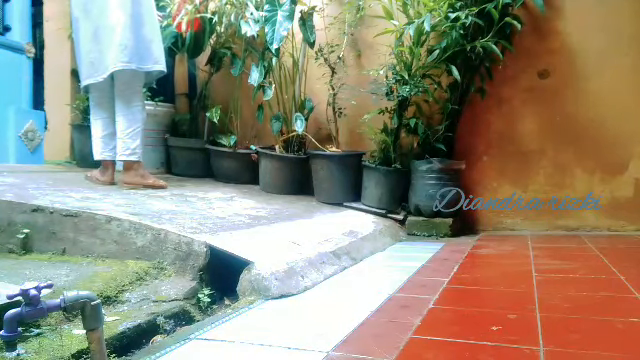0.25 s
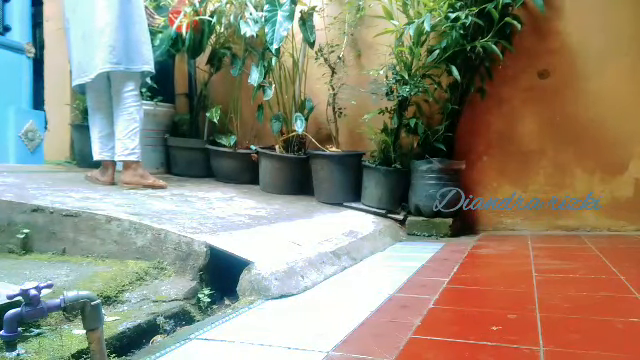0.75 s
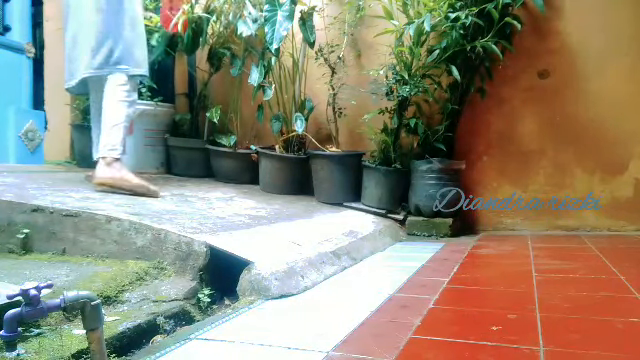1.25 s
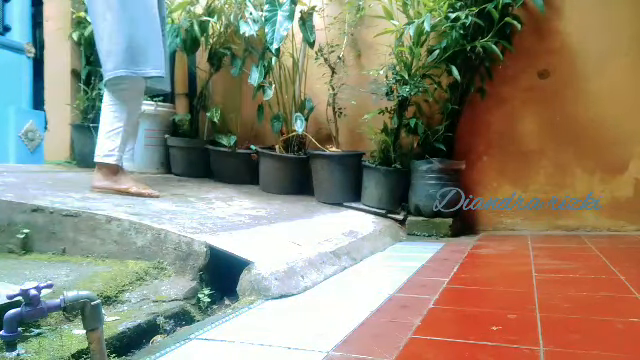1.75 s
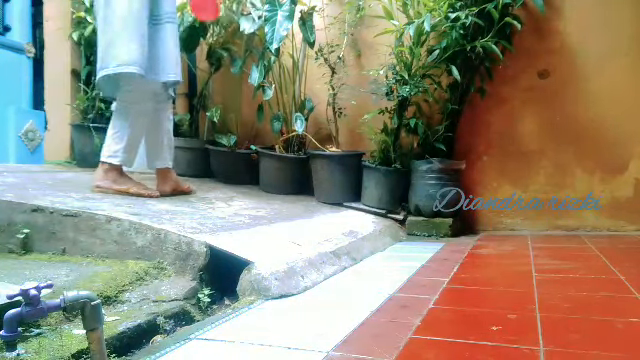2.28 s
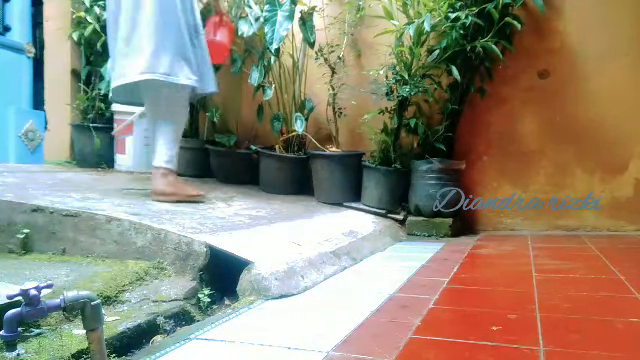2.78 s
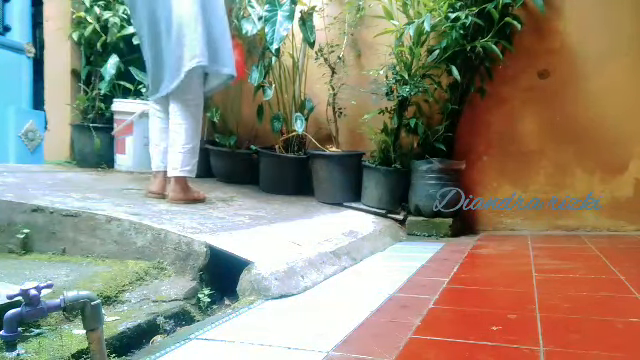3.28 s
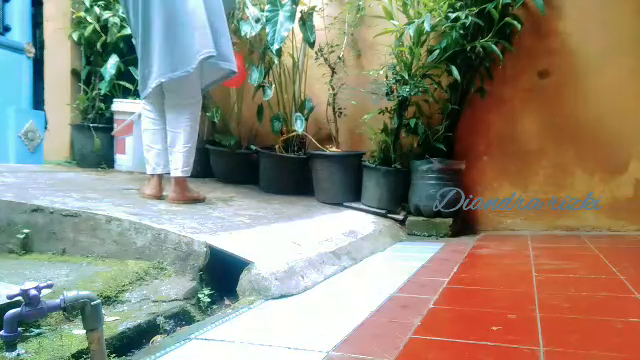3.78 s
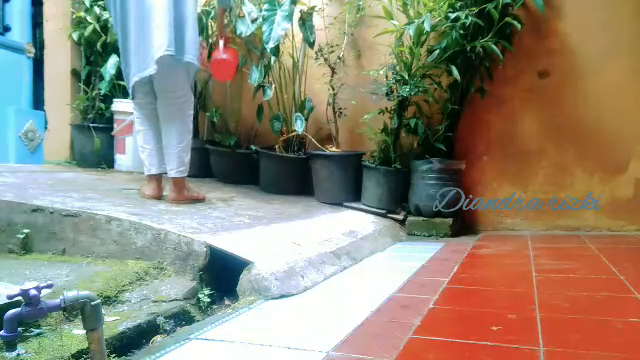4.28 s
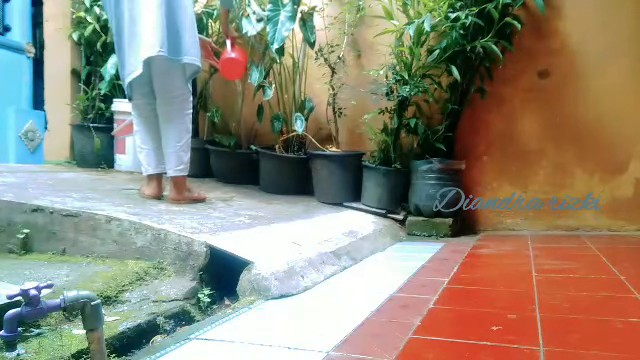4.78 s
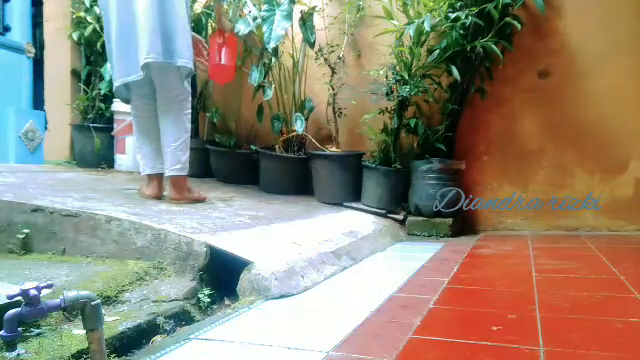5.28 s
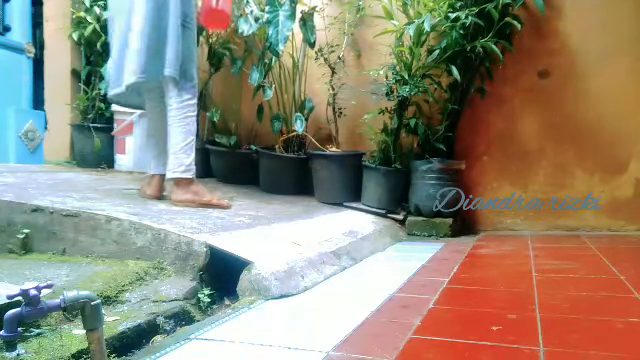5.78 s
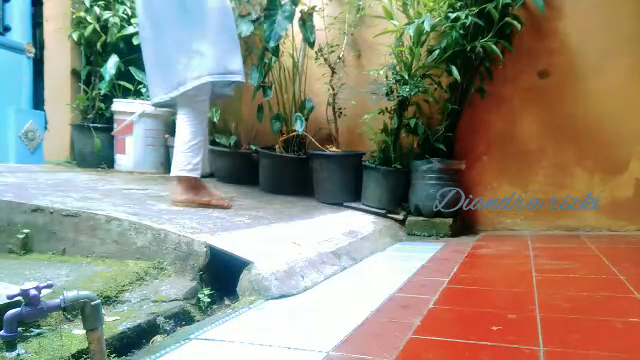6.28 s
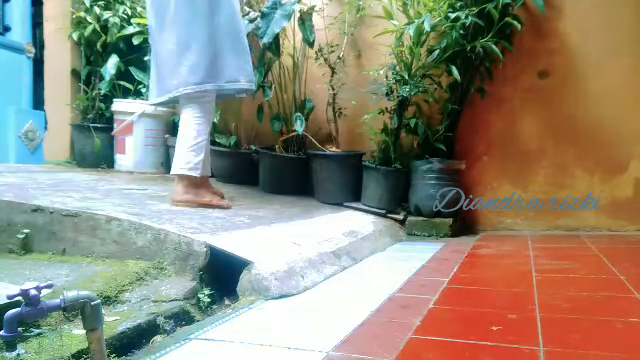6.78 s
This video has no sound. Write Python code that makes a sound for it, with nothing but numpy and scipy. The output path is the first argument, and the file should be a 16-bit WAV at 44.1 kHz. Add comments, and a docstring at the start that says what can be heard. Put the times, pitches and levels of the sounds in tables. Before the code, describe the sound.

Fine water patters on leaves and wet soil at close to medium distance, with small plops and hollow can glugs. Clear bird whistles sweep upward and trill, ringing between hard walls, with faint hoots behind. After the bird falls quiet, the pouring returns in stronger spurts. Finally the water stops, the hollow can thumps, and something scrapes grittily to a sharp clack, leaving gated, near-silent gaps.

```python
"""Potted plants are watered from a can in a small walled yard: spray hisses, droplets ring on leaves, soil
bubbles. Single drops tick, water plops and glugs, and splashes spatter and plop as bursts of band-limited
impacts. Birds hoot softly far off while a songbird whistles a loud phrase of gliding, trilled tones, echoed by
the walls. Late on come a hollow thump of ringing modes and a gritty scrape that ends in a clack. Noise makes
the steady air; a noise gate pulls down the pauses."""
import sys
import numpy as np
from scipy import signal
from scipy.fft import rfft, irfft
from scipy.io import wavfile
from scipy.ndimage import uniform_filter1d

SR = 44100
rng = np.random.default_rng(int(sys.argv[2]) if len(sys.argv) > 2 else 0)


def unload_wav(signal):
    """Save mono or channel-first audio to the path in sys.argv[1] as 16-bit WAV at rate SR, clipped to [-1, 1]."""
    wavfile.write(
        sys.argv[1],
        SR,
        np.round(np.clip(np.atleast_2d(signal).T, -1, 1) * 32767).astype(np.int16),
    )


N = 310552
TIME = np.arange(N) / SR
HALF_SECOND = TIME[:SR // 2]


def amp(db):
    """Decibels to gain."""
    return 10 ** (np.asarray(db) / 20)


def unit(x):
    """Scales to rms 1."""
    return x / np.sqrt(np.mean(x ** 2) + 1e-20)


def read(points, hz):
    """Interpolates a table on a log-frequency axis."""
    point_hz, value = np.transpose(points)
    return np.interp(np.log(hz + 1), np.log(point_hz + 1), value)


def add(mix, start_s, sound):
    """Mixes a sound in at its start time."""
    part = mix[max(round(start_s * SR), 0):][:len(sound)]
    part += sound[:len(part)]


def colour(x, points):
    """Filters x by a table of Hz and dB, then scales to rms 1."""
    gain = amp(read(points, np.fft.rfftfreq(len(x), 1 / SR)))
    return unit(irfft(rfft(x) * gain, len(x)))


def wander(length, size):
    """Smooth random drift: noise averaged twice over size samples, at rms 1 before the cut to length."""
    noise = rng.standard_normal(max(length, SR))
    return unit(uniform_filter1d(uniform_filter1d(noise, size), size))[:length]


def impacts(per_s, spread_db, size):
    """A random train of tiny impacts of either sign, a few much larger than the rest, at rms 1."""
    heights = amp(spread_db * np.minimum(rng.exponential(1, size), 4))
    signs = rng.choice([-1, 1], size)
    hits = rng.random(size) < per_s / SR
    return unit(heights * signs * hits)


def pings(hz, cycles, per_s, spread_db):
    """Droplets or bubbles of one pitch: random impacts each ring and decay over some cycles."""
    turns = np.arange(int(7 * cycles / hz * SR)) * hz / SR
    soft_start = 1 - np.exp(-(turns / 1.5) ** 2)
    ping = np.sin(2 * np.pi * turns) * np.exp(-turns / cycles) * soft_start
    return unit(signal.oaconvolve(impacts(per_s, spread_db, N), ping)[:N])


def ring(modes, rise_s):
    """A struck object: each mode (Hz, dB, t60 in s) decays on its own; a soft contact rounds the start."""
    t = HALF_SECOND
    tones = sum(amp(db - 60 * t / t60_s) * np.sin(2 * np.pi * hz * t) for hz, db, t60_s in modes)
    return tones * (1 - np.exp(-(t / rise_s) ** 2))


def cloud(db, length_s, centre_hz, octaves):
    """A short cloud of impacts in one log-frequency bell, with the treble dulled."""
    t, hz = HALF_SECOND, np.geomspace(40, 16000, 60)
    dull_db = read([(3900, 1.5), (4600, -14.0), (6500, -7.0), (14000, -34.5)], hz)
    band_db = -4.3 * (np.log2(hz / centre_hz) / octaves) ** 2 + dull_db
    grains = colour(impacts(per_s=3000, spread_db=3.0, size=len(t)), np.c_[hz, band_db])
    rise = np.minimum(t / (0.14 * length_s), 1)
    fall = np.exp(-np.maximum(t - length_s, 0) / 0.0033)
    return amp(db) * grains * rise * fall


# Echo decay between the walls. Each row: frequency in Hz, t60 in s before each source's decay factor.
YARD_DECAY = [(150, 0.43), (600, 0.36), (2000, 0.38), (3500, 0.39), (6000, 0.07), (14000, 0.57)]


def yard(x, wet, decay=1):
    """Direct sound plus dense wall echoes that decay per band; wet is their share of the power."""
    taps = rng.standard_normal(SR) * (rng.random(SR) < 3000 / SR)
    taps *= TIME[:SR] > .004  # first echo after 4 ms
    hz, t, bands = signal.stft(taps, SR, nperseg=256)
    t60_s = decay * read(YARD_DECAY, hz)[:, None]
    tail = signal.istft(bands * amp(-60 * t / t60_s) / np.sqrt(t60_s), SR, nperseg=256)[1]
    echoes = signal.fftconvolve(x, tail / np.linalg.norm(tail))[:N]
    return np.sqrt(1 - wet) * x + np.sqrt(wet) * echoes


# Spectrum of the yard's air. Each row: frequency in Hz, relative level in dB per Hz.
AIR_COLOUR = [(25, 1.5), (90, 7), (160, -2), (400, -8.5), (1000, -10.5), (3000, -11.5), (5000, -24),
              (8000, -24.5), (12500, -23), (15500, -15.5)]


def air():
    """Steady coloured noise."""
    return amp(-46) * colour(rng.standard_normal(N), AIR_COLOUR)


# Spectrum of the fine spray. Each row: frequency in Hz, relative level in dB per Hz.
SPRAY_COLOUR = [(1500, -33.5), (3500, 10), (5500, 5.5), (8000, -1), (10000, -0.5), (12500, 2),
                (15500, -10.5)]


def spray_hiss():
    """Fine spray: dense impacts blur into a bright hiss."""
    return colour(impacts(per_s=13000, spread_db=5.0, size=N), SPRAY_COLOUR)


# Balance of droplet pitches on the leaves. Each row: frequency in Hz, relative level in dB.
PATTER_COLOUR = [(900, -10.5), (1500, -4), (2100, 0), (2800, 1), (3750, 1), (4200, -8.5), (4800, -17.5),
                 (6000, -37.5)]


def leaf_patter(lowest_hz):
    """Droplets ring on leaves at many pitches; those below lowest_hz are held back."""
    patter = np.zeros(N)
    for hz in np.linspace(1000, 5600, 36):
        share = amp(read(PATTER_COLOUR, hz)) / np.sqrt(1 + (lowest_hz / hz) ** 16)
        patter += share * pings(hz * rng.uniform(1.0, 1.02), cycles=9, per_s=42, spread_db=2.5)
    return unit(patter)


# Balance of bubble pitches in the wet soil. Each row: frequency in Hz, relative level in dB.
BUBBLE_COLOUR = [(250, -16), (450, -8), (800, 6.5), (1100, -1.5), (1600, -1.5)]


def soil_bubbles():
    """Larger bubbles burst in wet soil, each a low decaying ring."""
    bubbles = np.zeros(N)
    for hz in np.geomspace(280, 1600, 18):
        bubbles += amp(read(BUBBLE_COLOUR, hz)) * pings(hz, cycles=12, per_s=4, spread_db=7)
    return unit(bubbles)


def flow(start_s, length_s, rise_s, fall_db_per_s):
    """Gain of running water: sets in quickly, holds, trails off."""
    t = TIME - start_s
    return np.clip(t / rise_s, 0, 1) * amp(-fall_db_per_s * np.maximum(t - length_s, 0))


POUR_RISE_S, SPRAY_FALL_DB_PER_S, PATTER_FALL_DB_PER_S = 0.01, 57, 105
GUSH_RISE_S, GUSH_FALL_DB_PER_S = .035, 122
GUSH_SPRAY_DB = -11.5  # relative to the gush's patter
THIN_HZ, GUSH_HZ = 2450, 1600  # lowest droplet pitch in a thin stream and in a gush
UNSTEADY_DB = 2.15  # rms wobble of the stream
# Tips of the can and dribbles. Each row: start in s, length in s, relative spray in dB, relative patter in dB.
CAN_POURS = [(-.05, 1.436, -41, -42.5), (2.263, 0.13, -50.5, -41.5), (3.31, 0.11, -44, -48.5),
             (3.673, 0.27, -50, -60), (3.836, 0.53, -45.5, -46.5), (4.508, 0.21, -47.5, -44.5),
             (4.807, 0.47, -44.5, -43), (5.412, 0.095, -61.5, -64.5)]
# Gushes, when the stream swells and hits harder. Each row: start in s, length in s, relative patter in dB.
STREAM_GUSHES = [(0.074, 0.073, -44), (0.694, 0.28, -47), (1.367, 0.036, -38.5), (1.546, .09, -50.5),
                 (3.424, 0.1, -41.5), (3.879, 0.34, -41), (4.35, 0.091, -43), (4.782, .16, -40),
                 (5.046, 0.19, -37)]


def shower():
    """Pours and gushes drive hiss, leaf patter and soil bubbles; gushes deepen the patter."""
    spray, stream, gushing = np.zeros((3, N))
    for start_s, length_s, spray_db, patter_db in CAN_POURS:
        spray += amp(spray_db) * flow(start_s, length_s, POUR_RISE_S, SPRAY_FALL_DB_PER_S)
        stream += amp(patter_db) * flow(start_s, length_s, POUR_RISE_S, PATTER_FALL_DB_PER_S)
    for start_s, length_s, patter_db in STREAM_GUSHES:
        gush = flow(start_s, length_s, GUSH_RISE_S, GUSH_FALL_DB_PER_S)
        spray += amp(patter_db + GUSH_SPRAY_DB) * gush
        stream += amp(patter_db) * gush
        gushing += gush
    lowest_hz = THIN_HZ + (GUSH_HZ - THIN_HZ) * np.sqrt(np.minimum(gushing, 1))
    hiss = amp(2.5) * spray * spray_hiss()
    hits = stream * (amp(10.5) * leaf_patter(lowest_hz) + amp(-13) * soil_bubbles())
    wobble = amp(UNSTEADY_DB * wander(N, size=1500))
    return yard((hiss + hits) * wobble, wet=0.37, decay=0.68)


# Large drops on leaves. Each row: start in s, relative level in dB, ring in Hz, t60 in s.
LEAF_DROPS = [(.0463, -1.5, 3740, 0.015), (0.112, -3, 2800, 0.017), (.4968, -23, 3850, 0.016),
              (1.3463, -18, 3340, .018), (1.4386, -19, 2250, 0.021), (3.4845, 3, 3720, 0.017),
              (3.6922, -4, 4400, 0.011), (4.074, -6.5, 2850, 0.022), (4.407, -7.5, 2890, 0.043),
              (4.5231, -6.5, 3810, 0.019), (4.5932, -5, 3010, 0.027), (4.635, 0.5, 2923, 0.031),
              (4.954, -0.5, 2750, .018), (5.0524, 1, 3590, .018), (5.551, -35.5, 3100, .09)]


def drips():
    """Single drops tick on leaves: two short modes, the upper one weaker and briefer."""
    ticks = np.zeros(N)
    for start_s, db, hz, t60_s in LEAF_DROPS:
        modes = [(hz, db - 5.5, t60_s), (hz * 1.4, db - 14.5, t60_s / 2)]
        add(ticks, start_s, ring(modes, rise_s=0.0012))
    return yard(ticks, wet=0.34, decay=0.77)


# Plops and glugs of water. Each row: start in s, mean pitch in Hz, relative level in dB, t60 in s.
WATER_PLOPS = [(.07, 283.4, -30, 0.4), (.13, 1091, -36.5, 0.7), (.25, 324, -37, 0.39), (.55, 94.8, -35, 0.45),
               (1.14, 447, -37, 0.13), (1.19, 451, -31.5, 0.082), (1.53, 440, -34.5, 0.32),
               (2.65, 387, -31.5, 0.29), (2.848, 341, -32.5, 0.45), (3.069, 246, -26.5, 0.12),
               (3.49, 481.5, -26, 0.14), (3.59, 319, -27, 0.053), (3.85, 867, -31, 0.09),
               (4.08, 890, -36, 0.11), (4.17, 600, -40.5, 0.11), (4.321, 1600, -33.5, 0.3),
               (4.37, 110.3, -35, 0.26), (4.41, 1052, -32.5, 0.12), (4.645, 282, -37, 0.5),
               (4.781, 278, -32, 0.48), (5.571, 119.7, -38, 0.38)]


def water_plops():
    """Water plops and glugs: decaying tones with a soft start and an unsteady pitch."""
    glugs, t = np.zeros(N), HALF_SECOND
    for start_s, hz, db, t60_s in WATER_PLOPS:
        turns = np.cumsum(hz * (1 + .09 * wander(len(t), size=200))) / SR
        envelope = (1 - np.exp(-t / 0.0037)) * amp(db + 4.5 - 60 * t / t60_s)
        add(glugs, start_s, np.sin(2 * np.pi * turns) * envelope)
    return yard(glugs, wet=0.24)


SPATTER_OCTAVES, PLOP_OCTAVES = 0.53, 0.57
# Splashes on soil. Each row: start in s, length in s, relative spatter in dB, spatter centre in Hz,
# relative plop in dB, plop centre in Hz.
SOIL_SPLASHES = [(0.101, 0.032, -27, 2870, -33, 1030), (0.198, 0.13, -28, 2560, -34, 1200),
                 (0.71, 0.051, -32, 2220, -34, 606), (0.814, 0.078, -24, 2600, -53, 1320),
                 (1.391, 0.0072, -54, 1700, -28.5, 850), (1.429, 0.0078, -17, 3340, -27, 600),
                 (2.298, 0.075, -36.5, 2150, -42.5, 993), (2.774, 0.043, -33.5, 1670, -36.5, 980),
                 (3.061, 0.022, -26, 2376, -26.5, 253), (3.401, 0.077, -31, 2550, -30, 483),
                 (3.473, 0.041, -20.5, 2260, -21.5, 514), (3.538, 0.07, -33, 2100, -35.5, 315),
                 (3.801, 0.068, -28, 2900, -33.5, 1330), (4.389, 0.016, -38, 3000, -41, 1200),
                 (4.815, 0.08, -25.5, 2400, -27.5, 497), (5.042, 0.019, -20, 2970, -30.5, 860),
                 (5.066, 0.071, -41, 2500, -24, 910)]


def splashes():
    """Water slaps the soil: a bright spatter and a plop, both clouds of impacts."""
    out = np.zeros(N)
    for start_s, length_s, spatter_db, spatter_hz, plop_db, plop_hz in SOIL_SPLASHES:
        spatter = cloud(spatter_db, length_s, spatter_hz, SPATTER_OCTAVES)
        plop = cloud(plop_db, length_s, plop_hz, PLOP_OCTAVES)
        add(out, start_s, spatter + plop)
    return yard(out, wet=0.47, decay=0.71)


ONSET_DB, FADE_SHAPE, OVERTONE_DB = -15.5, 0.93, -48
TRILL_UNEVEN, TREMOLO_PER_HZ = 0.096, 0.0013  # a deeper trill also shakes the loudness


def whistle(length_s, first_hz, goal_hz, half_s, depth_hz, db, rise_s, fade_db, waver, trill_hz):
    """A near-pure tone glides towards its goal; a fast, uneven trill is deepest in mid-glide."""
    t = np.arange(0, length_s, 1 / SR)
    glide = t ** 2 / (t ** 2 + half_s ** 2)
    hz = first_hz + (goal_hz - first_hz) * glide
    depth = depth_hz * (1 - (2 * glide - 1) ** 2)
    onset_db = ONSET_DB * np.maximum(1 - t / rise_s, 0) ** 2
    faded = (np.maximum(t - rise_s, 0) / (length_s - rise_s)) ** FADE_SHAPE
    level_db = db + onset_db - fade_db * faded
    trill_rate = trill_hz * (1 + TRILL_UNEVEN * wander(len(t), size=300))
    trill = depth * np.sin(2 * np.pi * np.cumsum(trill_rate) / SR)
    phase = 2 * np.pi * np.cumsum(hz * (1 + waver * wander(len(t), size=70)) + trill) / SR
    tone = np.sin(phase) + amp(OVERTONE_DB) * np.sin(2 * phase)
    tone *= 1 + TREMOLO_PER_HZ * trill
    return np.sqrt(2) * amp(level_db) * tone * signal.windows.tukey(len(t), .1)


HOOT_RISE_S, HOOT_FADE_DB, HOOT_FLUTTER_HZ = .05, 4, 32  # flutter is the trill depth
# Soft, far hoots. Each row: start in s, length in s, first pitch in Hz, goal pitch in Hz, level in dB.
FAR_HOOTS = [(0.336, 0.22, 585, 599, -39), (0.472, 0.2, 645.5, 600, -39), (1.928, .29, 1274, 1162, -38),
             (2.148, .21, 874, 977, -38), (2.326, .42, 650, 574, -42.5), (4.447, 0.096, 667, 570, -41),
             (4.991, .345, 607, 584, -37.5)]


def far_hoots():
    """Low fluttering whistles, heard almost wholly as echoes."""
    far = np.zeros(N)
    for start_s, length_s, first_hz, goal_hz, db in FAR_HOOTS:
        hoot = whistle(length_s, first_hz, goal_hz, length_s / 2, HOOT_FLUTTER_HZ, db,
                       HOOT_RISE_S, HOOT_FADE_DB, waver=0.035, trill_hz=38.24)
        add(far, start_s, hoot)
    return yard(far, wet=0.94)


# Whistled notes. Each row: start in s, length in s, first pitch in Hz, goal pitch in Hz, time to mid-glide in s,
# trill depth in Hz, level in dB, rise in s, fade in dB (negative grows).
SONG_NOTES = [(.53, 0.051, 2157, 2290, .05, 10, -32.5, 0.077, -0.5),
              (0.587, 0.27, 2234, 2745, 0.093, 37, -14.5, 0.074, 1.5),
              (0.991, 0.25, 2685, 3497, 0.098, 187, -12, 0.028, 5),
              (1.382, 0.06, 2119, 2180, 0.073, 10, -15.5, 0.014, 13.5),
              (1.446, 0.22, 2122, 2705, 0.093, 73, -18.5, 0.055, -1),
              (1.718, 0.11, 2584, 2963, 0.045, 96, -10.5, 0.072, 4.5),
              (1.782, 0.26, 3228, 3600, 0.028, 116, -13.5, .04, 25),
              (2.039, 0.098, 2123, 1983, 0.043, 90, -20.5, 0.01, 4.5),
              (2.187, .25, 2100, 2231, 0.067, 40, -22, 0.057, 11),
              (2.37, 0.18, 3260, 3483, 0.048, 130, -16.5, 0.074, 5),
              (2.478, 0.098, 3473, 3155, .075, 240, -14.5, 0.022, 7.5),
              (2.595, 0.16, 2425, 2190, 0.19, 110, -15.5, 0.021, 6),
              (2.829, 0.24, 3427, 3647, .05, 112, -13.5, 0.059, 14.5),
              (3.049, 0.17, 2352, 2325, 0.042, 18, -19, 0.008, 5),
              (3.221, .14, 2075, 2019, 0.06, 11, -23, 0.024, 5)]


def songbird():
    """A loud phrase of trilled whistles rings long between the walls."""
    near = np.zeros(N)
    for start_s, *note in SONG_NOTES:
        add(near, start_s, whistle(*note, waver=0.0098, trill_hz=75.38))
    return yard(near, wet=0.89, decay=1.77)


# Faint brief puffs of noise. Each row: start in s, relative level in dB, length in s, centre in Hz,
# width in octaves.
FAINT_PUFFS = [(2.128, -40.5, 0.069, 700, 0.85), (2.644, -43.5, 0.04, 890, 3.4),
               (3.022, -38.5, 0.034, 555, 0.073), (5.555, -41.5, 0.061, 217, 0.41),
               (5.778, -35.5, 0.092, 870, .15), (6.168, -44, 0.079, 800, 0.1),
               (6.257, -42, 0.062, 990, 1.3), (6.484, -25.5, 0.029, 242, 0.4),
               (6.719, -46, 0.024, 500, 1.36), (6.81, -45, 0.0071, 600, 0.67),
               (6.847, -56.5, 0.005, 1007, 1.6), (7, -44, 0.052, 777, 0.35)]


def faint_puffs():
    """Faint brief clouds of noise, some narrow and toneful, some wide and dull."""
    out = np.zeros(N)
    for start_s, db, length_s, centre_hz, octaves in FAINT_PUFFS:
        add(out, start_s, cloud(db, length_s, centre_hz, octaves))
    return yard(out, wet=0.47, decay=0.71)


# Blows of the thump. Each row: start in s, relative level in dB.
THUMP_BLOWS = [(5.817, -7.5), (5.8248, -0.5), (5.831, -4)]
# Modes of the hollow body. Each row: frequency in Hz, relative level in dB, t60 in s.
BODY_MODES = [(124.7, -20, 0.61), (145.1, -21, 0.46), (199.7, -20.5, 0.22), (275, -41, 0.14),
              (396, -13, 0.14), (666, -28, 0.65), (838, -23.5, 0.32), (981, -25, 0.216), (1790, -27.5, .12),
              (2360, -24.5, .12), (2420, -22, 0.088), (2700, -30, 0.1), (3470, -26.5, 0.11)]
# Spectrum of the contact crack. Each row: frequency in Hz, relative level in dB per Hz.
CRACK_COLOUR = [(59, -34), (100, -3), (315, 2), (524, -9), (824, 4.5), (1340, -19.5), (1720, -6.5),
                (2960, -8), (4010, -20), (4400, -37), (9000, -63), (11700, -80.5), (19800, -120)]


def hollow_thump():
    """Blows in quick succession: each a short noise crack over the ringing modes of a hollow body."""
    thump, t = np.zeros(N), HALF_SECOND
    for start_s, db in THUMP_BLOWS:
        envelope = np.exp(-t / 0.0099) * (1 - np.exp(-(t / 0.00054) ** 2))
        crack = colour(rng.standard_normal(len(t)), CRACK_COLOUR) * envelope
        body = ring(BODY_MODES, rise_s=0.0017)
        add(thump, start_s, amp(db - 5.5) * (crack + body))
    return yard(thump, wet=0.38, decay=0.91)


# Pressure of the scrape. Each row: time in s, relative level in dB.
SCRAPE_PRESSURE = [(6.32, -32.5), (6.337, -18.5), (6.36, -20), (6.396, -25), (6.425, -15), (6.46, -21),
                   (6.501, -22), (6.54, -30.5), (6.6, -36)]
# Spectrum of the grit. Each row: frequency in Hz, relative level in dB per Hz.
GRIT_COLOUR = [(120, -37), (250, -9.5), (350, -4), (600, -2), (840, 1.5), (1100, -4.5), (1500, -5.5),
               (2100, -9.5), (2900, -11), (3800, -17.5), (4400, -31.5), (5400, -35), (6300, -46),
               (7200, -37), (8300, -55.5), (14000, -56)]


def gritty_scrape():
    """Dense grit impacts follow the scraping pressure."""
    time_s, pressure_db = np.transpose(SCRAPE_PRESSURE)
    pressure = amp(np.interp(TIME, time_s, pressure_db, left=-120, right=-120))
    grit = colour(impacts(per_s=3800, spread_db=2, size=N), GRIT_COLOUR)
    return yard(grit * pressure, wet=0.42, decay=0.94)


CLACK_S = 6.4978
# Modes of the closing clack. Each row: frequency in Hz, relative level in dB, t60 in s.
CLACK_MODES = [(1980, -6, .04), (2170, -2, .03), (2520, -4, .015), (3000, -9, .012), (3330, -9, .035),
               (4000, -14, .025)]


def closing_clack():
    """A hard contact rings short, high modes."""
    clack = np.zeros(N)
    add(clack, CLACK_S, ring(CLACK_MODES, rise_s=.0005))
    return yard(clack, wet=0.33, decay=0.88)


def scene():
    """All sources over the steady air of the yard."""
    water = shower() + drips() + water_plops() + splashes()
    birds = far_hoots() + songbird()
    handling = hollow_thump() + gritty_scrape() + closing_clack()
    return (air() + water + birds + faint_puffs() + handling)[None]


THRESHOLD_DB, SLOPE_DB_PER_DB, DEPTH_DB = -43, 7, 32
EDGE_HZ = 15750


def record(dry):
    """A quick noise gate cuts what falls below its threshold; then a low-pass limits the band."""
    level_db = 10 * np.log10(abs(uniform_filter1d(dry[0] ** 2, size=330)) + 1e-12)
    cut_db = np.clip(SLOPE_DB_PER_DB * (THRESHOLD_DB - level_db), 0, DEPTH_DB)
    gated = dry * amp(-uniform_filter1d(cut_db, size=120))
    low_pass = signal.firwin(511, EDGE_HZ, window=("kaiser", 9), fs=SR)
    return signal.oaconvolve(gated, low_pass[None], "same")


dry = scene()
out = record(dry)
unload_wav(out)
```